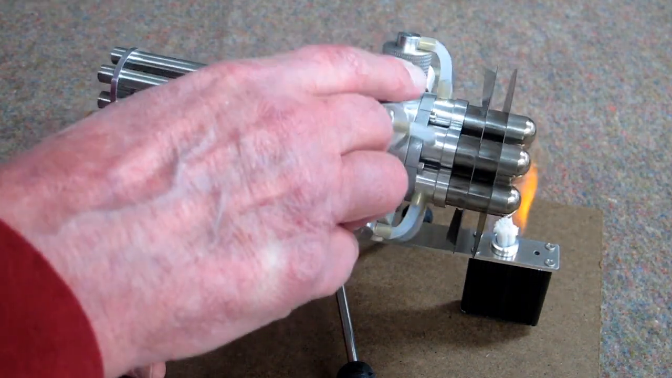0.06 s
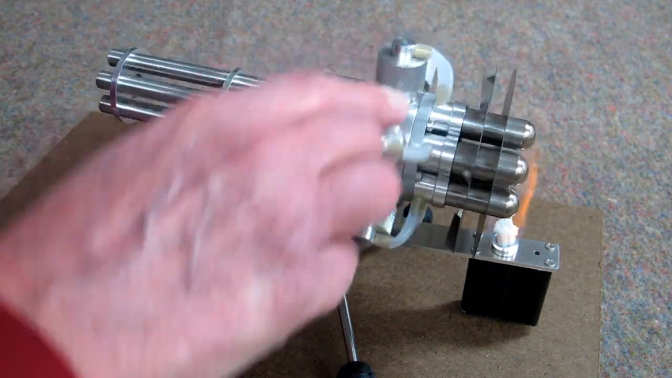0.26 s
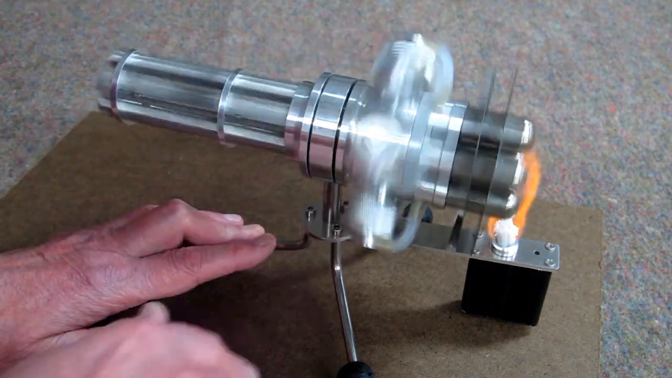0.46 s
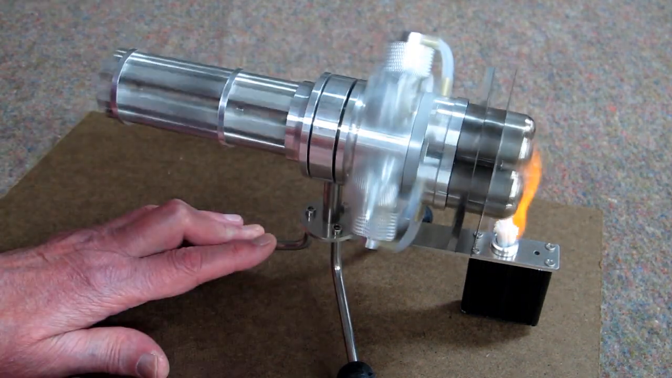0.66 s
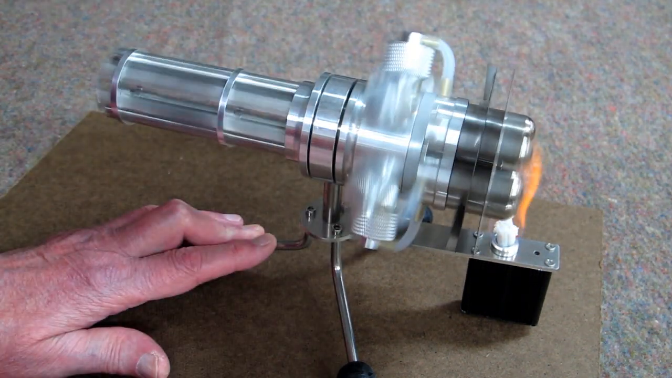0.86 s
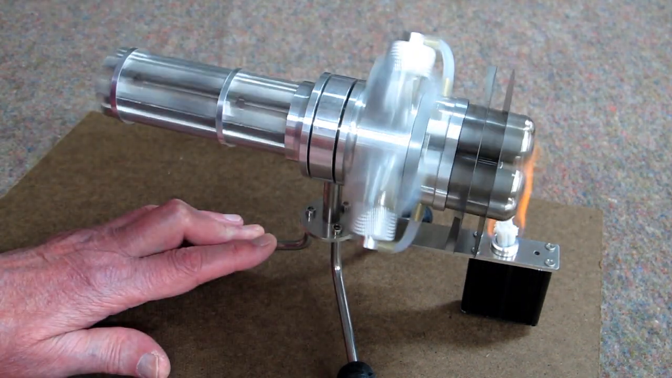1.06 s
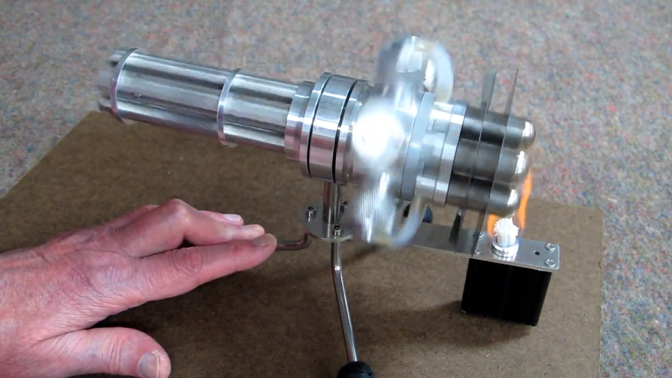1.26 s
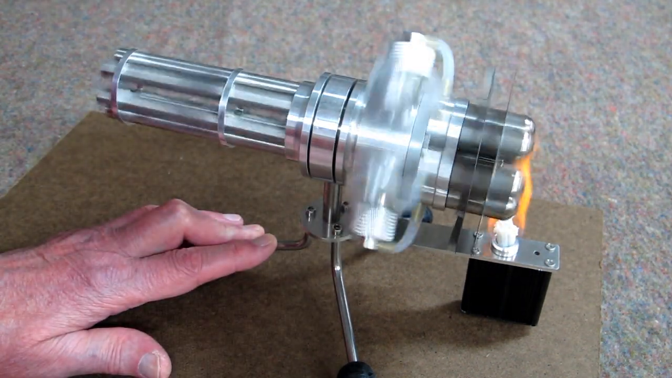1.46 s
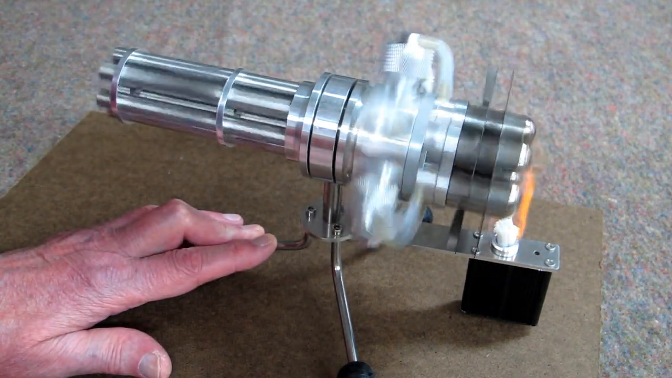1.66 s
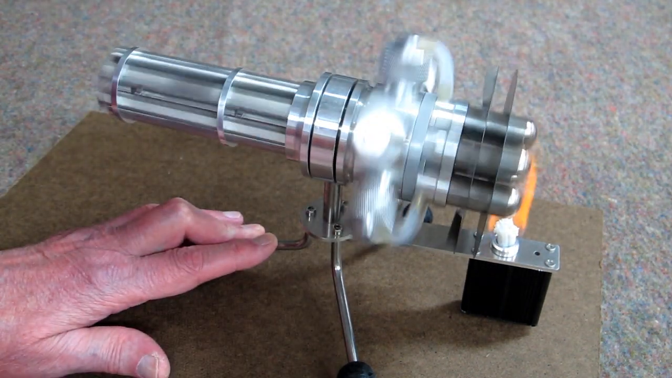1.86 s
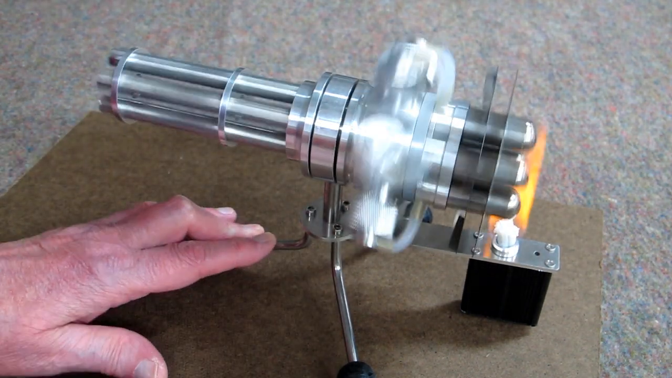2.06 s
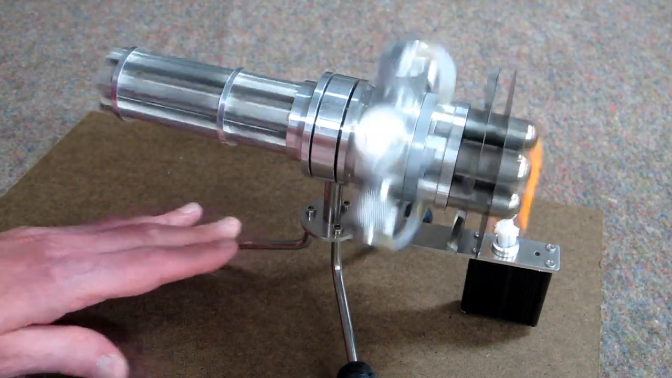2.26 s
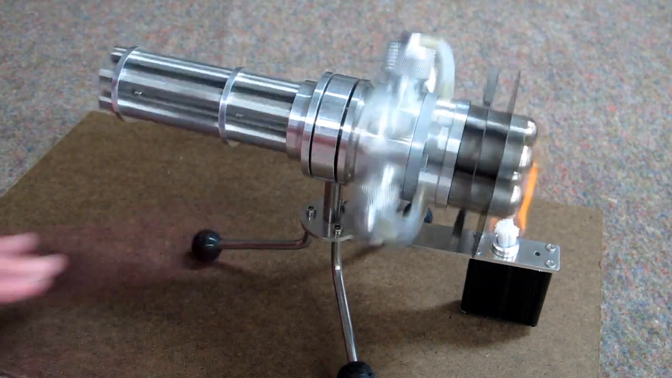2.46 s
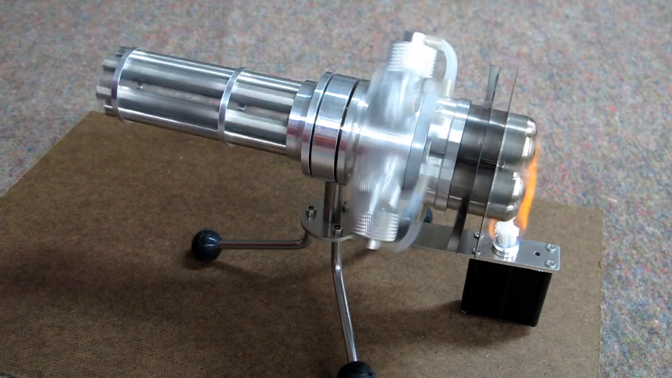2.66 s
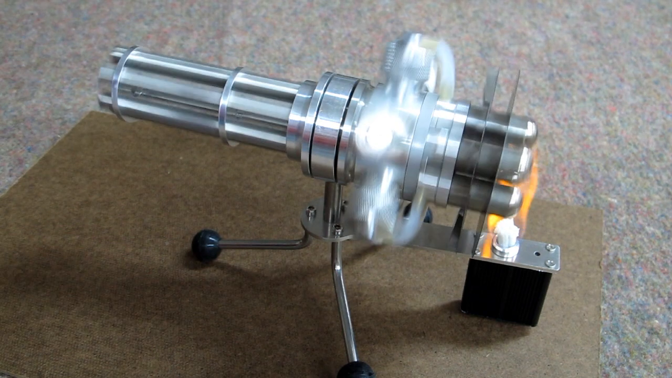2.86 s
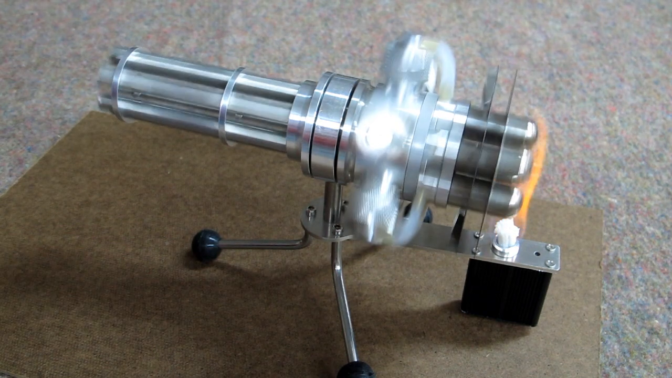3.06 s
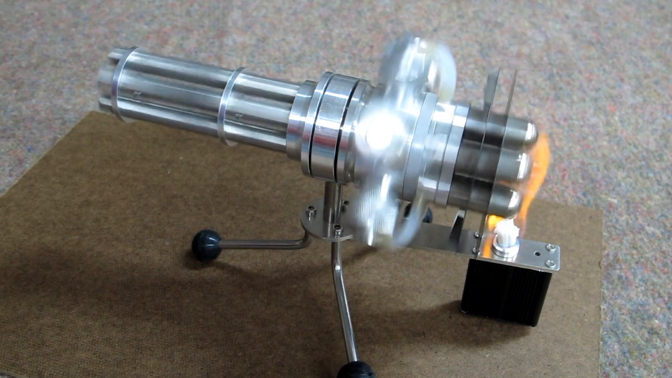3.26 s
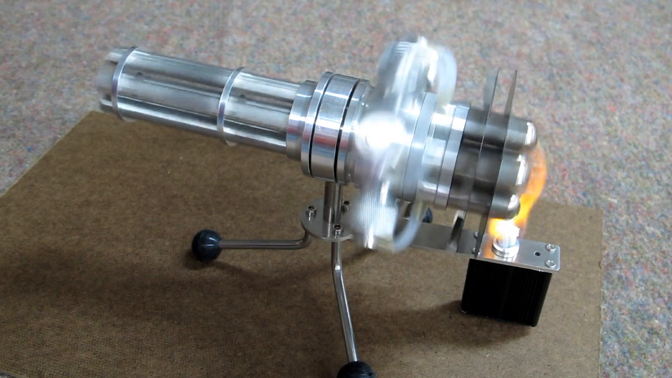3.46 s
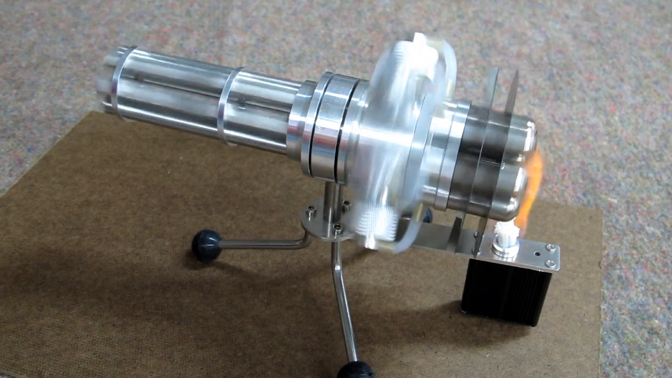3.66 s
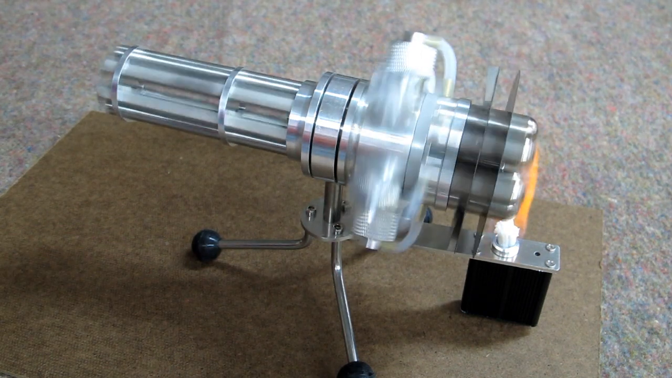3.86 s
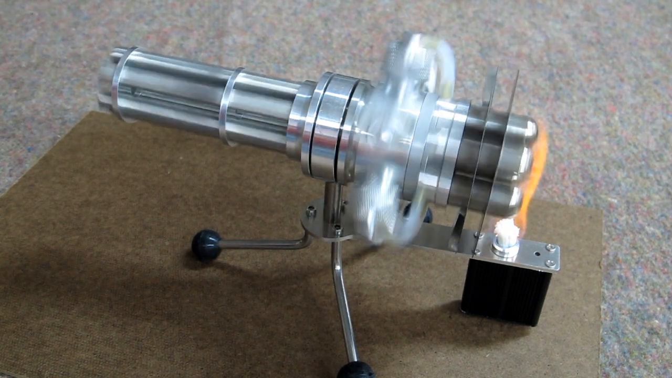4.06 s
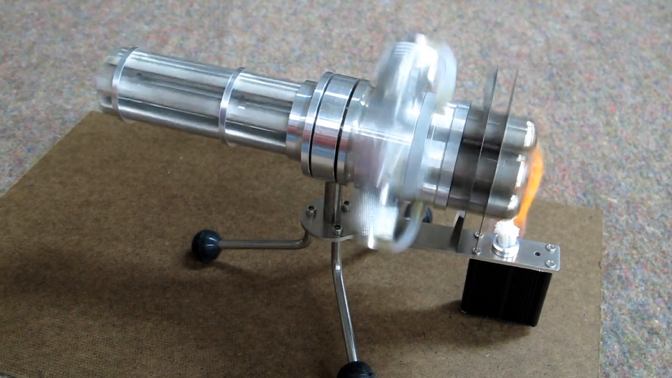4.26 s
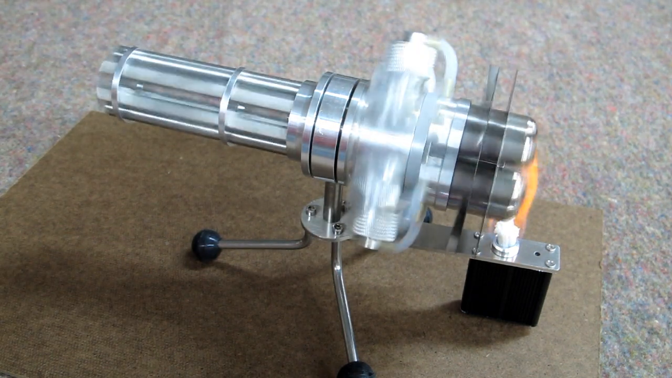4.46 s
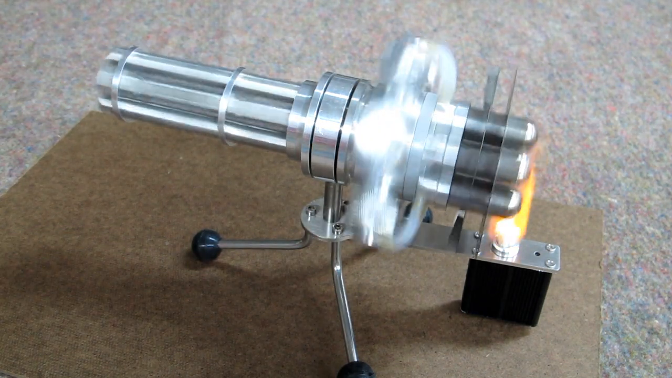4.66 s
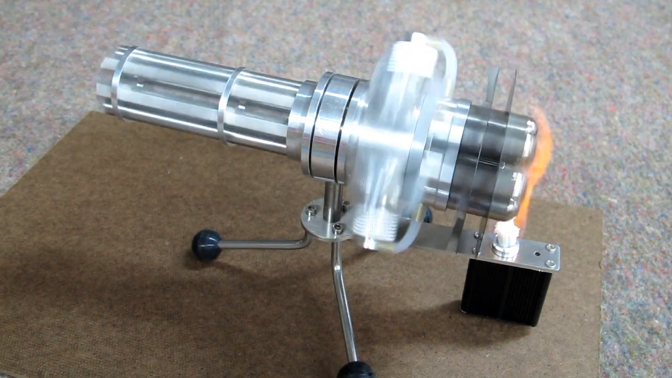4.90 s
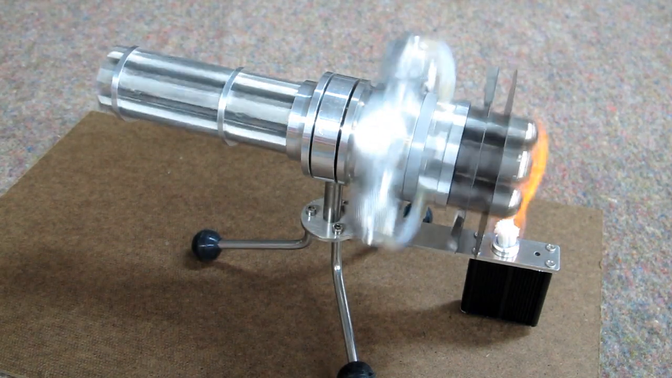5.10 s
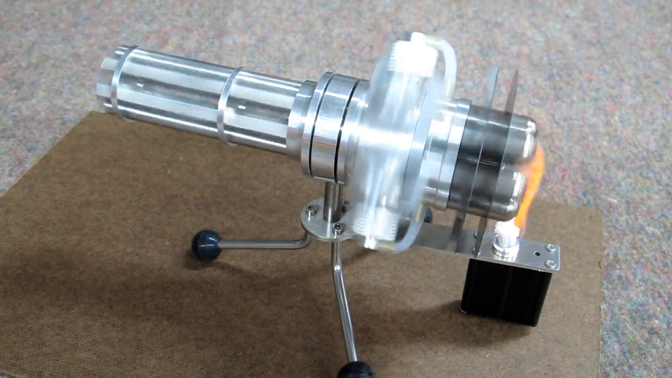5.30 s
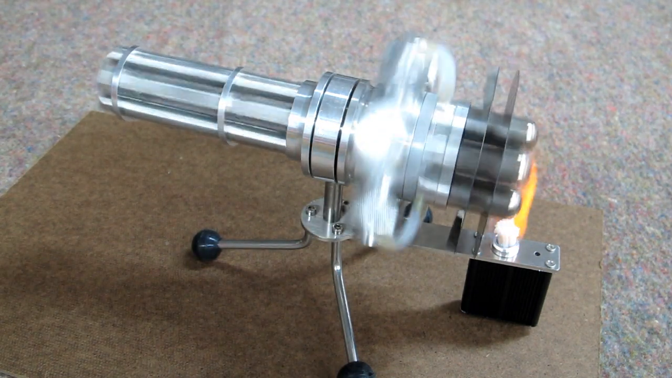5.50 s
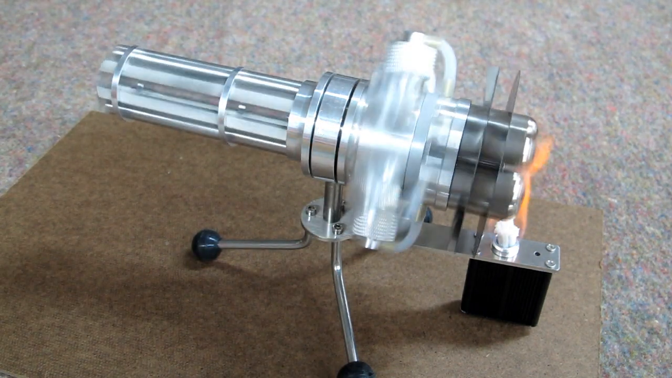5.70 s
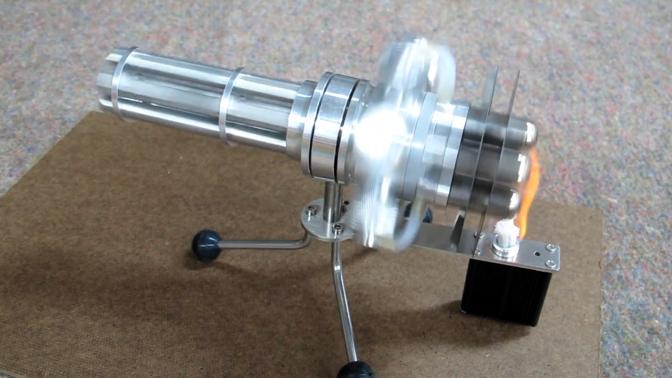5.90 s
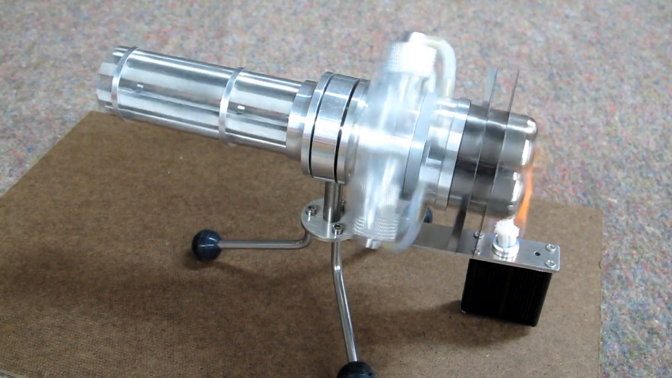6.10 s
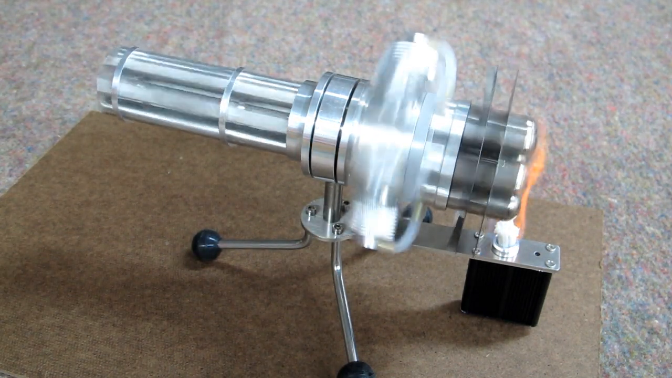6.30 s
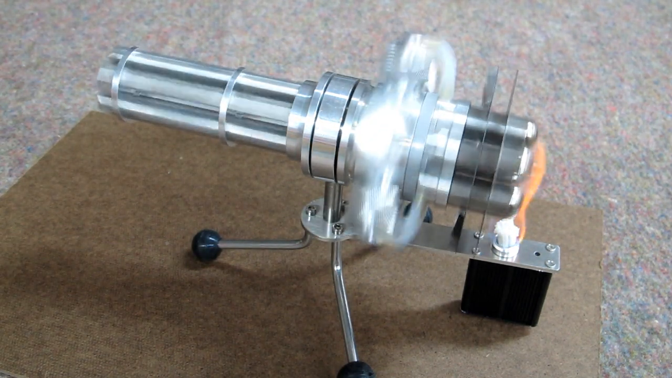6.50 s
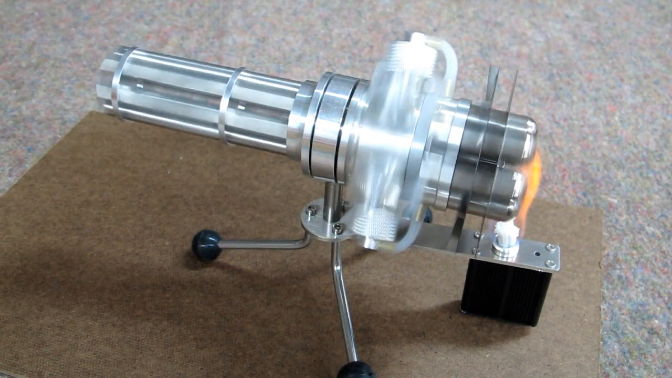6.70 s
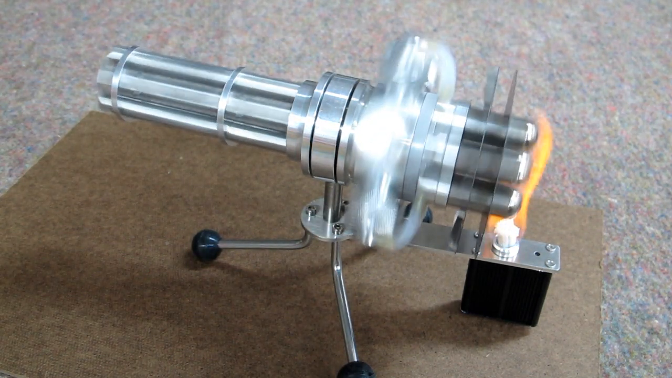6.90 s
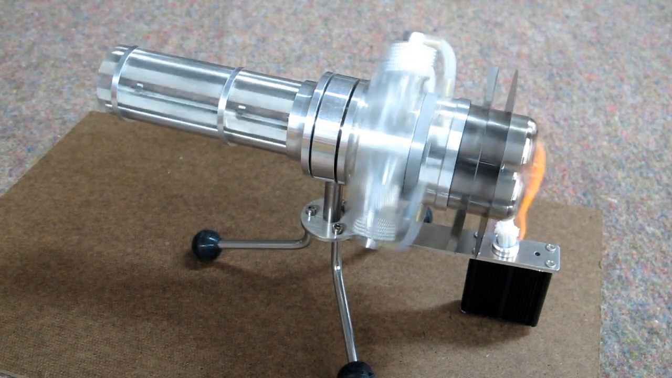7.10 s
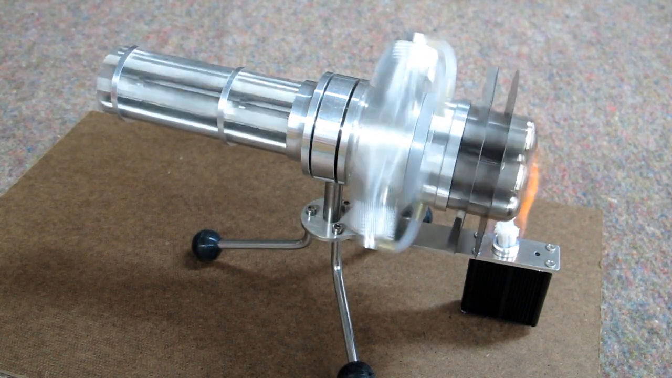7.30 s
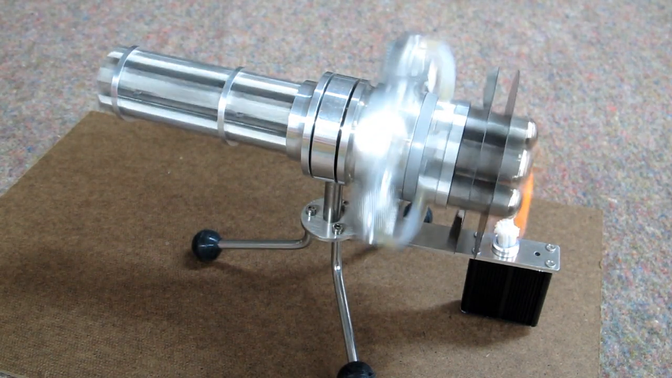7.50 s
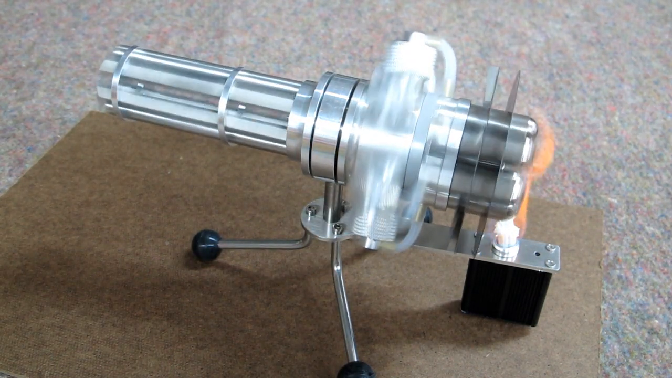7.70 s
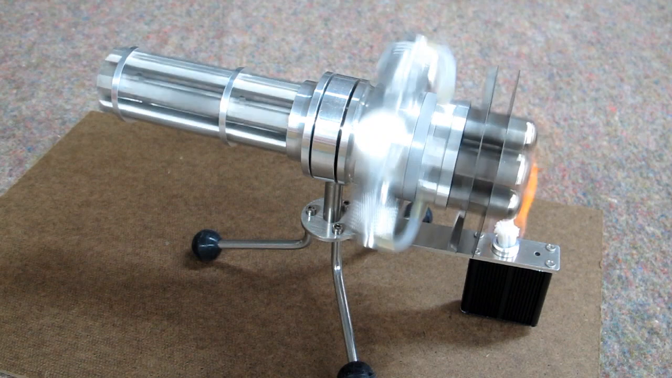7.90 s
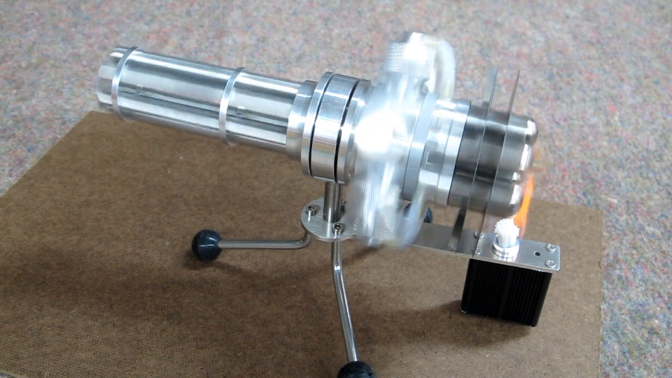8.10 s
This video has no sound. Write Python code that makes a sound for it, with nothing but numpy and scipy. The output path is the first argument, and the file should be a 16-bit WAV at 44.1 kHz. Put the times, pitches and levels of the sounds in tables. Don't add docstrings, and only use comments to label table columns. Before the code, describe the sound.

Half a second of near silence with faint hiss and low rumble, then a small metal engine is flicked into motion. Bright clicks and looser ticks repeat about four times a second, slowing slightly. Near three seconds a hand softly bumps the table; the engine catches, quickens and settles into a tight repeating clatter to the end. Close stereo microphone, small quiet carpeted room, very little echo.

```python
import sys
import numpy as np
from scipy import signal
from scipy.fft import rfft, irfft
from scipy.io import wavfile
from scipy.ndimage import uniform_filter1d, map_coordinates

SR = 44100
rng = np.random.default_rng(int(sys.argv[2]) if len(sys.argv) > 2 else 0)


def gain_from_decibels(decibels):
    exponent = np.asarray(decibels, float) / 20
    return 10 ** exponent


def pcm_store(signal):
    levels = np.round(np.clip(np.atleast_2d(signal), -1, 1) * 32767)
    wavfile.write(sys.argv[1], SR, levels.astype(np.int16).T)


N = 359354


def shape(table, hz, column=1):
    table = np.array(table, float)
    return np.interp(np.log(hz + 1), np.log(table[:, 0]), table[:, column])


def coloured(x, table):
    y = irfft(rfft(x) * gain_from_decibels(shape(table, np.fft.rfftfreq(N, 1 / SR))), N)
    return y / np.sqrt(np.mean(y ** 2))


def noise(table):
    return coloured(rng.standard_normal(N), table)


def curve(table):
    s, db = np.transpose(table)
    return gain_from_decibels(np.interp(np.arange(N) / SR, s, db, left=-120))


def ring(x, hz, t60):
    pole = np.exp(2j * np.pi * hz / SR - np.log(1000) / (t60 * SR))
    return signal.lfilter([1], [1, -pole], x).imag


def strikes(s, gain):
    inside = s * SR < N - 1
    return np.bincount(np.clip((s * SR).astype(int), 0, N - 1), gain * inside, N)


# [dB per Hz, relative]
AIR_COLOUR = [(71, -47), (120, -16), (157, -7.5), (188, -11), (236, -11.5), (436, -15), (15000, -33),
              (16000, -43)]
# start_s [s], level_db [dB]
BUILDING_RUMBLE = [
    (0.0, -65),
    (4.42, -71.5),
    (8.15, -67),
]


def air():
    air_db, same_below_hz = -61.5, 720.0
    deep_colour = [(20, -20), (45, -5.0), (60, -2.0), (90, 0), (125, -5.5), (200, -39)]
    deep = curve(BUILDING_RUMBLE)
    mid = gain_from_decibels(air_db) * noise(AIR_COLOUR) + deep * noise(deep_colour)
    apart = signal.lfilter(*signal.butter(1, same_below_hz, "high", fs=SR), noise(AIR_COLOUR))
    side = gain_from_decibels(air_db) * apart + gain_from_decibels(-8.5) * deep * noise(deep_colour)
    return np.array([gain_from_decibels(-0.3) * (mid + side), gain_from_decibels(2.0) * (mid - side)])


# start_s [s], level_db [dB]
SLIDING = [
    (0.49, -44),
    (0.7, -43.5),
    (7.32, -40.5),
    (8.15, -39.5),
]


def slide():
    ticks_per_s, tick_s, spread_db = 300., 0.00051, 3.
    ticks_db, hiss_db, bearing_db = -5., -4.5, -45.5
    tilt = [(300, -37), (800, -10), (1600, -11.5), (3700, -6.5), (4500, -3.0),
            (7500, -5.5), (9500, -12.5), (12500, -17.5), (16000, -24.0)]
    hit = rng.random(N) < ticks_per_s / SR
    size = np.minimum(rng.exponential(size=N), 3)
    gate = signal.lfilter([1], [1, -np.exp(-1 / (tick_s * SR))], hit * gain_from_decibels(spread_db * size))
    ticks = coloured(gate * rng.standard_normal(N), tilt)
    hiss = gain_from_decibels(ticks_db) * ticks + gain_from_decibels(hiss_db) * noise(tilt)
    rumble = noise([(100, -24), (200, -29), (330, 3.0), (480, -9), (900, -24.5)])
    level = curve(SLIDING)
    moving = level > gain_from_decibels(-100)
    return gain_from_decibels(-0.5) * level * hiss + gain_from_decibels(bearing_db - 7.) * moving * rumble


# start_s [s], level_db [7 kHz peak dB]
CRANK_KNOCKS = [(0.492, -10), (0.7224, -8.5), (0.968, -8.5), (1.224, -10), (1.4963, -10), (1.7812, -10),
                (2.0824, -13.5), (2.3972, -9.5), (2.727, -10.5)]
CRANK_PLAY_KNOCKS = [(0.4975, -17), (0.7608, -21), (0.9736, -20), (1.2377, -21.5), (1.5057, -24),
                     (1.786, -20), (2.0792, -20), (2.7231, -21)]
FOLLOWER_KNOCKS = [(0.502, -11.5), (0.7283, -15.5), (0.9796, -13), (1.2457, -16), (1.522, -15.5),
                   (1.814, -15.5), (2.119, -15), (2.436, -15.5), (2.7686, -18), (2.7698, -18.5)]
PISTON_KNOCKS = [(0.8324, -15), (0.9305, -22), (1.033, -20), (1.1465, -20), (1.3, -17), (1.351, -15),
                 (1.41, -20), (1.5785, -15), (1.6874, -18), (1.8704, -15), (1.981, -19.5), (2.177, -18),
                 (2.2896, -17.5), (2.499, -21), (2.6128, -16), (2.835, -19.5)]
PISTON_PLAY_KNOCKS = [(0.7719, -17), (0.8929, -19.5), (0.916, -21), (1.028, -17.5), (1.138, -19),
                      (1.4025, -18), (1.6805, -20.5), (1.973, -21), (2.281, -21), (2.4926, -19),
                      (2.6032, -19.5), (2.8312, -21.5)]
REBOUND_KNOCKS = [(0.6725, -27), (0.7935, -23), (1.0498, -23), (1.3218, -28), (1.6016, -27.5),
                  (1.893, -25.5), (2.1996, -23.5), (2.516, -25.5), (2.8539, -26.5)]
HALF_TURN_KNOCKS = [(0.6035, -16.5), (0.6087, -9.5), (0.8372, -11.5), (1.091, -12.5), (1.355, -17.5),
                    (1.633, -14), (1.9278, -13), (2.232, -14.5), (2.5581, -14)]
CAM_KNOCKS = [(0.9521, -19.5), (1.191, -17.5), (1.4547, -17.5), (1.7355, -16.5), (2.0265, -16.5),
              (2.3362, -15.5), (2.661, -15.5)]
BEFORE_CAM_TICKS = [
    (1.183, -26.5),
    (1.4486, -27),
    (1.7306, -26),
]
BOUNCE_KNOCKS = [(0.51, -25.5), (0.617, -35), (0.8952, -34), (0.984, -31), (0.99, -30), (1.106, -30),
                 (1.313, -30), (1.826, -39), (1.937, -28), (1.9395, -35), (2.098, -36), (2.353, -29),
                 (2.4584, -30), (2.569, -24), (2.6773, -27)]
STRAY_TICKS = [(0.598, -33), (0.6914, -34), (1.005, -27), (1.1692, -23), (1.4303, -27), (1.515, -41),
               (1.5411, -32), (1.5492, -43), (1.5938, -26), (1.7035, -26), (1.752, -27), (1.834, -24),
               (1.9941, -41), (2.0437, -51), (2.1405, -33), (2.3033, -28), (2.4144, -27), (2.4695, -41),
               (2.7424, -45), (2.7946, -27), (2.8055, -38), (2.8659, -30), (2.893, -33)]
START_PARTS = [CRANK_KNOCKS, CRANK_PLAY_KNOCKS, FOLLOWER_KNOCKS, PISTON_KNOCKS, PISTON_PLAY_KNOCKS, REBOUND_KNOCKS,
               HALF_TURN_KNOCKS, CAM_KNOCKS, BEFORE_CAM_TICKS, BOUNCE_KNOCKS, STRAY_TICKS]
# top_9500hz_db, mid_3600hz_db, low_1200hz_db, thud_db, ringing_db [all dB]
START_COLOURS = [(0.5, -21, -20, -16.5, -5.5), (-5, -8, -8, -12.5, -14), (-2.5, -8, -12.5, -11.5, -7.5),
                 (3, -10.5, -12, -9.5, -7.5), (-7, -7.5, -10, -11, -5), (-2, -7, -9, -7, -1.5),
                 (3.5, -5.5, -10.5, -20, -7), (2.5, -2.5, -7, -11.5, -8.5), (11, -9, -3, -5, -2),
                 (1, -3, -12, -1.5, -26), (-4, -11, -9.5, -19, -20)]


def start_knocks(scatter_db):
    s, db = np.concatenate(START_PARTS).T
    counts = [len(rows) for rows in START_PARTS]
    top, mid, low, thud, ringing = np.repeat(START_COLOURS, counts, axis=0).T
    between = (low + mid) / 2 - 1.5
    band_db = np.c_[low, low - 2.5, between, mid, 0 * s, top, top - 14, thud] + db[:, None]
    band_db = band_db + scatter_db * rng.standard_normal(band_db.shape)
    return s, np.c_[band_db, ringing]


TURN_COUNT = 22


def turn_times():
    catch_turn_s, first_turn_s = 2.8745, 3.1235
    final_turn_s, time_lost_s, settle_turns = .21986, .1974, 6.466
    turn = np.arange(TURN_COUNT + 2)
    lost_s = time_lost_s * (1 - np.exp(-turn / settle_turns))
    return np.r_[catch_turn_s, first_turn_s + final_turn_s * turn + lost_s]


THUD, RINGING = 7, 8
# first_angle, last_angle [turns], first_db, last_db [7 kHz peak dB]
TURN_KNOCKS = [(-0.036, -0.044, -26, -23), (-0.002, -0.002, -11, -11), (0.048, 0.04, -40, -29),
               (0.137, 0.129, -27, -22), (0.167, 0.161, -15, -12), (0.236, 0.254, -36, -27),
               (0.303, 0.301, -23, -21), (0.325, 0.32, -24, -16), (0.406, 0.421, -37, -31),
               (0.421, 0.452, -38, -32), (0.482, 0.478, -24, -21), (0.492, 0.492, -19, -17),
               (0.526, 0.545, -36, -33), (0.623, 0.614, -24, -19), (0.658, 0.654, -21, -17),
               (0.704, 0.723, -37, -27), (0.769, 0.748, -19, -17), (0.807, 0.799, -26, -25)]
# top_9500hz_db, mid_3600hz_db, highest_12000hz_db, thud_db, ringing_db [all dB]
TURN_COLOURS = [(-0.5, -4, -13, -42, -38), (-1, -30, -18.5, -16.5, -9), (-24, -13, 3, -17, -24),
                (3, -1.5, -10, -10, -34), (-6.5, -13.5, -16.5, -14.5, -6.5), (-1, -12, -11, -11, -5),
                (1.5, -3, -28, -29, -17), (-0.5, -13.5, -13, -4, -6.5), (15, 5, -17, -11, -15),
                (-12, -26, -17, -10, -16), (-1, 0, 1, -20, -11), (9, -9.5, -3.5, -13.5, -9.5),
                (-17, -1, 4, -18, -40), (-11, -4, -25, -18, -21), (1, -11.5, -8.5, -7.5, -0.5),
                (10, -3, -10, -10, -9), (-3, -3.5, -10, -20, -6), (7, -2.5, -14, -4.5, -6)]
# low_800hz_db, low_1700hz_db, low_2500hz_db [all dB]
TURN_LOW_ENDS = [(-4.5, -10, -4), (-25.5, -46, -29), (-1.5, -8, 1.5), (-9, -13, -8), (-15, -16, -12),
                 (-4.5, -36, -6), (-6.5, -13, -21), (-13, -21, -11.5), (-2.5, -19, -27), (-10, -35, -1),
                 (-3.5, -8, -16.5), (-11, -31, -9), (-7, -29, 6.5), (-6.5, -12.5, -12), (-18, -13.5, -7.5),
                 (-2.5, -12, 3), (-14.5, -5.5, -22), (-11.5, -12, -9)]
# start_s [s], level_db [dB]
RUNNING_LEVEL = [
    (2.9, -0.2),
    (3.7, -0.6),
    (4.45, -0.1),
    (4.8, 1.27),
    (6.3, 0.8),
    (8.15, 0.3),
]


def running_knocks(scatter_db):
    catch_s, angle_scatter = 2.9, .001
    loose_slip_turns, loose_scatter_db = .009, 1.2
    turn_s = turn_times()[:, None]
    turns, parts = len(turn_s) - 1, len(TURN_KNOCKS)
    age = np.clip((np.arange(turns)[:, None] - 1) / (TURN_COUNT - 1), 0, 1)
    first, last, first_db, last_db = np.transpose(TURN_KNOCKS)
    loose = np.arange(parts) == 16
    chance = rng.standard_normal((turns, parts, RINGING + 2))
    slack = angle_scatter * gain_from_decibels(-.5 * (last_db + 18))
    wander = np.where(loose, loose_slip_turns * age, slack)
    angle = first + (last - first) * age + wander * chance[..., 0]
    blow_db = first_db + (last_db - first_db) * age
    blow_db = blow_db + loose * (1.0 + loose_scatter_db * rng.standard_normal(age.shape))
    blow_db = blow_db + np.interp(turn_s[:-1], *np.transpose(RUNNING_LEVEL))
    top, mid, highest, thud, ringing = np.transpose(TURN_COLOURS)
    relative = np.c_[TURN_LOW_ENDS, mid, 0 * last, top, highest, thud, ringing]
    band_db = relative + scatter_db * chance[..., 1:]
    band_db[..., :RINGING] += blow_db[..., None]
    s = (turn_s[:-1] + angle * np.diff(turn_s, axis=0)).ravel()
    heard = (s > catch_s) & (s < N / SR)
    part = np.tile(np.arange(parts), turns)
    return s[heard], band_db.reshape(-1, RINGING + 1)[heard], part[heard]


def knock_list():
    scatter_db = 1.2
    start_s, start_db = start_knocks(scatter_db)
    run_s, run_db, run_part = running_knocks(scatter_db)
    start_part = len(TURN_KNOCKS) + np.arange(len(start_s))
    return np.r_[start_s, run_s], np.r_[start_db, run_db], np.r_[start_part, run_part]


KNOCK_BANDS = [800, 1700, 2500, 3600, 6800, 9500, 12000]
# pitch_hz [Hz], level_db [dB]
BODY_COLOUR = [(250, -7), (550, 1), (1700, 2), (2500, 3), (2900, -2.5), (3600, 4.5), (4400, -5), (5500, 1),
               (6800, -1), (8100, 2.5), (10500, -6.5), (12000, 3), (13500, -13.5), (16500, -38)]


def cracks(s, band_db, part):
    t60, chatter_t60, rise_s = 0.0079, 0.031, .0001
    chatter_db, gain_db, fresh = -15.0, 9.5, 0.3
    size, lead = 1024, 64
    t = np.arange(size - 2 * lead) / SR
    burst = rng.standard_normal((part.max() + 1, len(t)))[part]
    burst = burst + fresh * rng.standard_normal((len(s), len(t)))
    decay = 1000. ** (-t / t60) + gain_from_decibels(chatter_db) * 1000. ** (-t / chatter_t60)
    burst = burst * decay * (1 - np.exp(-t / rise_s))
    spectrum = rfft(np.pad(burst, ((0, 0), (lead, lead))))
    even = spectrum / np.sqrt(uniform_filter1d(np.abs(spectrum) ** 2, size=35, axis=1))
    hz = np.fft.rfftfreq(size, 1 / SR)
    colour_db = np.array([shape(np.c_[KNOCK_BANDS, row[:THUD]], hz) for row in band_db])
    colour_db = colour_db + shape(BODY_COLOUR, hz)
    energy = np.sqrt(t60 * SR / (2 * np.log(1000)))
    waves = irfft(even * gain_from_decibels(colour_db + gain_db) * energy, size)
    at = (s * SR).astype(int)[:, None] - lead + np.arange(size)
    return np.bincount(at.ravel(), waves.ravel(), N + size)[:N]


# pitch_hz [Hz], level_db [dB re the knock in that band], t60_s [s]
METAL_MODES = [(3776, -11.5, 0.095), (3926, -8.5, 0.044), (3320, -10, 0.036), (6830, -3.5, 0.019),
               (7160, -34, 0.017), (7800, -13, 0.017), (11820, -5, 0.02), (718, -15.5, 0.088),
               (940, -38, 0.022)]


def ringing_metal(s, band_db):
    luck = gain_from_decibels(3.5 * rng.standard_normal((len(s), len(METAL_MODES))))
    sound = np.zeros(N)
    for k, (hz, db, t60) in enumerate(METAL_MODES):
        nearest = np.argmin(np.abs(np.log(np.array(KNOCK_BANDS) / hz)))
        blow = gain_from_decibels(band_db[:, nearest] + band_db[:, RINGING] + db)
        sound = sound + ring(strikes(s, blow * luck[:, k]), hz, t60)
    return sound


# pitch_hz [Hz], level_db [dB], t60_s [s]
TABLE_MODES = [(299.4, -9.5, 0.12), (333.2, -10, 0.088), (366.8, -4.5, 0.08)]


def table_thud(s, band_db):
    blows = strikes(s + 0.0019, gain_from_decibels(band_db[:, THUD] - 10.5))
    thud = sum(gain_from_decibels(db) * ring(blows, hz, t60) for hz, db, t60 in TABLE_MODES)
    return signal.sosfilt(signal.butter(2, [250., 430.], "band", fs=SR, output="sos"), thud)


def engine():
    s, band_db, part = knock_list()
    knocks = cracks(s, band_db, part) + ringing_metal(s, band_db) + table_thud(s, band_db)
    return signal.sosfilt(signal.butter(4, 200., "high", fs=SR, output="sos"), knocks) + slide()


def room(x):
    t60, gap_s, wet_db, same_below_hz = 0.32, 0.0073, -40.5, 2500.0
    t = np.arange(int(.5 * SR)) / SR
    x = signal.lfilter(*signal.butter(2, 550., "high", fs=SR), x)
    common, apart = rng.standard_normal((2, len(t))) * 1000. ** (-t / t60) * (t > gap_s)
    apart = signal.lfilter(*signal.butter(1, same_below_hz, "high", fs=SR), apart)
    alike = signal.lfilter(*signal.butter(1, same_below_hz, fs=SR), common)
    return gain_from_decibels(wet_db) * np.array([signal.fftconvolve(x, tail)[:N] for tail in (alike + apart, common)])


def sway(x):
    sway_s, sway_db, sway_per_s = 1.1e-5, 1.8, 40
    hold = int(SR / sway_per_s)
    steps = np.repeat(rng.standard_normal((2, N // hold + 1)), hold, axis=1)
    walk = uniform_filter1d(steps, hold, axis=1)[:, :N]
    delayed = map_coordinates(x, [np.arange(N) + sway_s * SR * walk[1]], mode="mirror")
    return gain_from_decibels(sway_db * walk[0]) * delayed


# start_s [s], pitch_hz [Hz], level_db [dB], t60_s [s]
HAND_BUMP = [
    (2.89, 94, -48, 0.29),
    (2.890, 200, -42.5, 0.3),
    (2.893, 420, -39.5, 0.14),
    (2.925, 400, -43.5, 0.14),
    (2.912, 130, -50, 0.13),
]


def hand_bump():
    return sum(ring(strikes(np.array([s]), gain_from_decibels(np.array([db]))), hz, t60) for s, hz, db, t60 in HAND_BUMP)


# pitch_hz [Hz], level_db [dB], phase_lead_rad [rad]
LEFT_PORT_COLOUR = [(100, -1.5, 0), (1410, -5, 0.35), (2330, -1.5, 0.4), (2900, 0.5, 1.27),
                    (3360, -0.3, -0.4), (5040, 3, -2), (5570, 3.5, -3), (6510, -11.5, -3),
                    (6520, -10.5, -2), (8300, -18.5, -2), (9350, -22, -2), (11070, -9.5, -1),
                    (15100, -40, -7)]


def scene():
    near = engine() + hand_bump()
    left, right = near + room(near)
    hz = np.fft.rfftfreq(N, 1 / SR)
    lead = np.exp(1j * shape(LEFT_PORT_COLOUR, hz, column=2))
    port = gain_from_decibels(shape(LEFT_PORT_COLOUR, hz)) * lead
    left = irfft(rfft(sway(left)) * port, N)
    return np.array([left, right]) + air()


def top_cut(x):
    return signal.sosfilt(signal.butter(12, 16400, fs=SR, output="sos"), x)


def record(dry):
    cut = signal.sosfilt(signal.ellip(8, .2, 70, 16200, fs=SR, output="sos"), dry)
    return top_cut(cut)


dry = scene()
out = record(dry)
pcm_store(out)
```